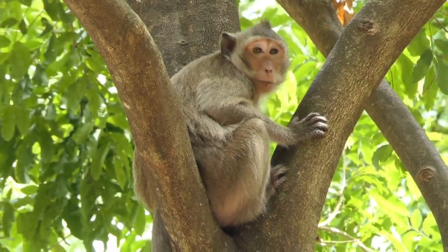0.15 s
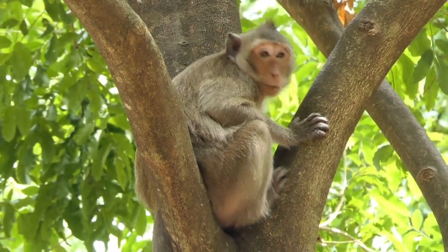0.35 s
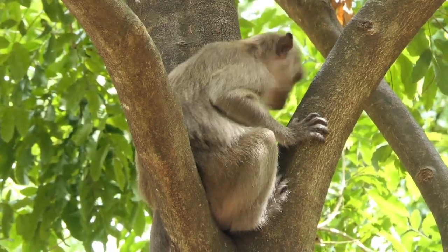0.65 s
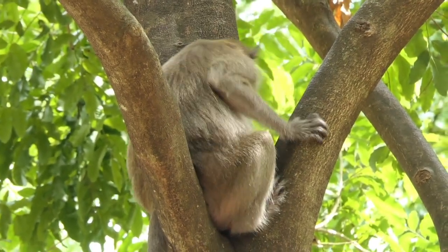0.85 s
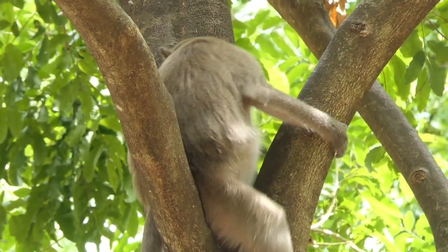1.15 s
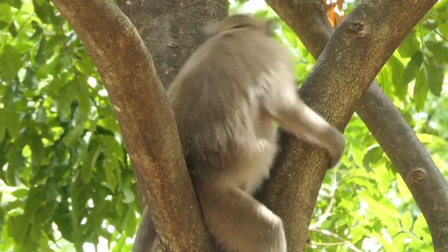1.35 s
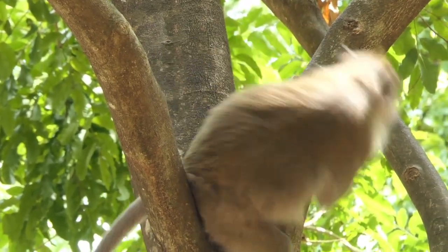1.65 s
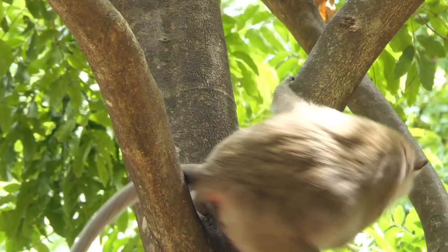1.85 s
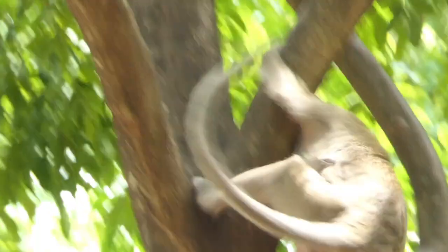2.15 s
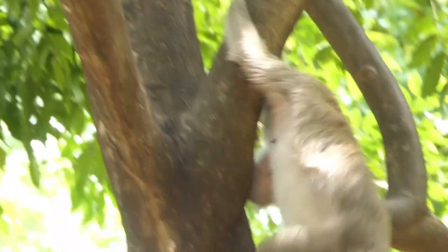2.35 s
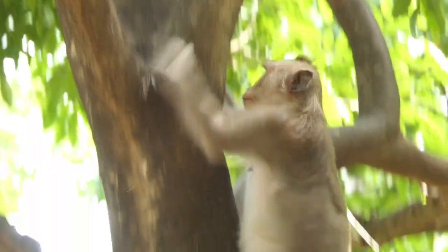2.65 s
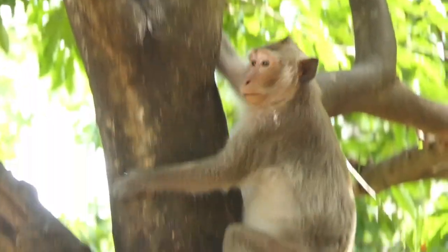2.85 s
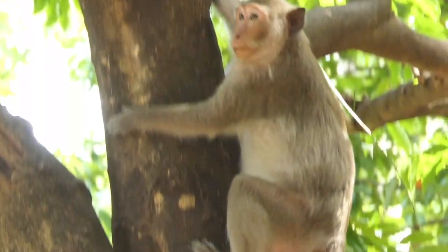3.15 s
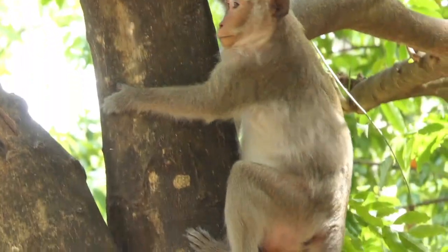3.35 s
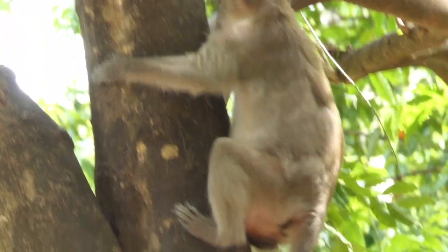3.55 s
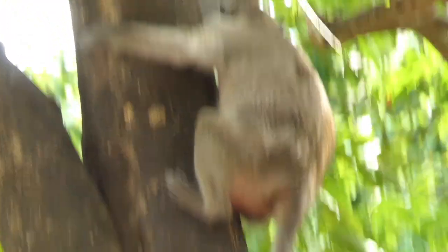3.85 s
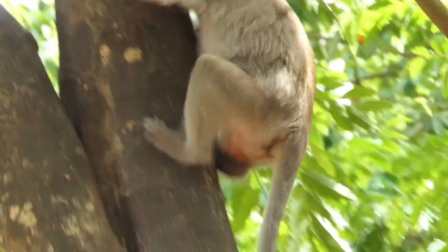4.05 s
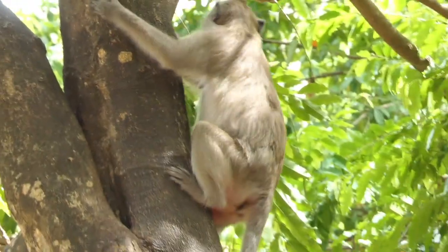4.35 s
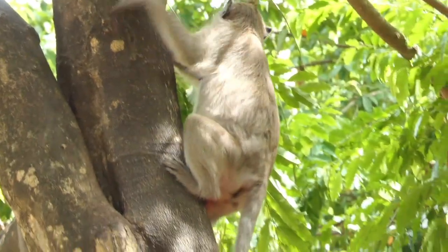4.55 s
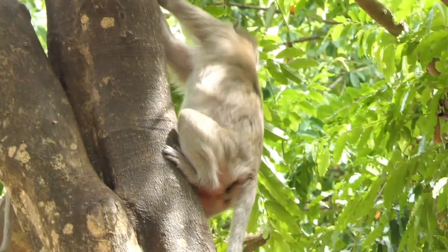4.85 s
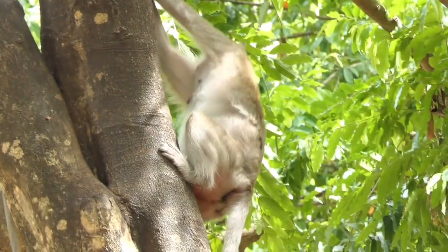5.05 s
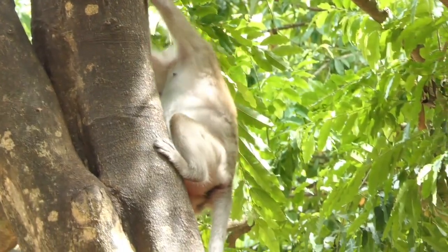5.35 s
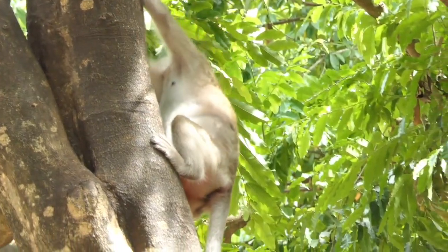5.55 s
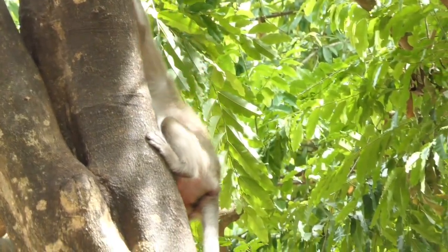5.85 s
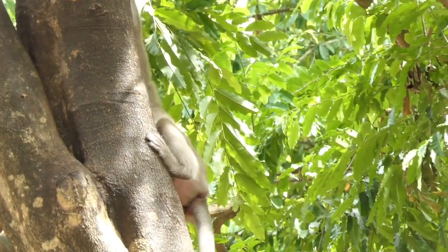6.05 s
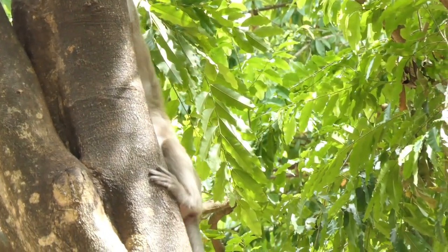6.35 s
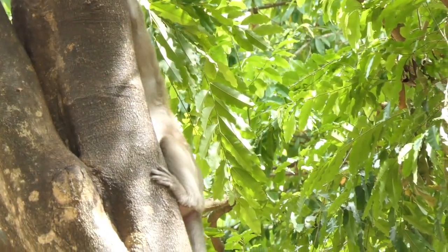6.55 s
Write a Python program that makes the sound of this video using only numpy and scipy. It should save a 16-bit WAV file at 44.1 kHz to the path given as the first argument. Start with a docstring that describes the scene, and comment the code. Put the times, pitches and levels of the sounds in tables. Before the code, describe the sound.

Outdoors, dry leaves and twigs are disturbed close to a stereo microphone, with almost no reverberation. From 0 to 0.4 s a tight cluster of sharp woody snaps comes with a sudden crunch at 0.25 s. Small treads and single clicks follow around 0.8 to 1.4 s, with a very short stem creak at 1.15 s and thin scrapes. From 1.8 to 2.3 s brittle snaps and a strong leafy drag swell up; another dense burst of crunching and cracking runs from 2.6 to 3.3 s, then lighter treads until about 4.1 s. A lull leaves faint leaf stirring and a soft, narrow insect hiss peaking near 5.4 s. From 6.1 s rustling and clicks build to a loud snap at about 6.65 s. Throughout, a distant engine idles in a low hum, speeding slightly then slowing, beneath a soft wash of air.

```python
"""Animals move in dry leaves: resonant clicks snap at once, treads crush noise crackle from 0.25 s on.
At 1.15 s a bent stem creaks in harmonics; then treads and drags, gated noise with hiss, until about 4 s.
In the lull a narrow insect hiss swells near 5.4 s; a last drag and a loud snap end the scene at 6.7 s.
Throughout, a far engine, a sum of sines, idles a little faster, then slower, over a noise wash of air."""
import sys
import numpy as np
from scipy import signal
from scipy.io import wavfile

SR = 44100
rng = np.random.default_rng(int(sys.argv[2]) if len(sys.argv) > 2 else 0)


def log_audio(samples):
    """Write samples as a 16-bit WAV file to the path given in sys.argv[1]."""
    # one column per channel
    frames = np.atleast_2d(samples).T
    # limit to full scale, then quantise
    limited = np.clip(frames, -1, 1)
    pcm = np.round(limited * 32767).astype(np.int16)
    wavfile.write(sys.argv[1], SR, pcm)


def boost(x):
    """Linear amplitude factor 10**(x/20) for a level x in decibels (scalar or array-like)."""
    u = np.asarray(x, float) / 20
    return 10 ** u


N = 295470


def rms_one(x):
    """Scale to unit power."""
    return x / np.sqrt(np.mean(x ** 2) + 1e-20)


def in_time(rows):
    """Each column of a table as a curve per sample; the first column is seconds."""
    s, *columns = np.transpose(rows)
    return [np.interp(np.arange(N) / SR, s, c) for c in columns]


def at_hz(points, hz):
    """Read a spectrum on a log-frequency axis."""
    point_hz, db = np.array(points).T
    return np.interp(np.log(hz), np.log(point_hz + 1), db)


def drift(rate_hz):
    """Slow random curve of spread 1: noise through a two-pole low-pass."""
    r = np.exp(-80 * np.pi * rate_hz / SR)  # one step per 40 samples
    noise = rng.standard_normal(N // 40 + 2002)
    slow = signal.lfilter([1], [1, -2 * r, r * r], noise)[2000:]
    return np.interp(np.arange(N) / 40, np.arange(len(slow)), rms_one(slow))


def resonate(x, hz, width_hz):
    """One resonance, gain 1 on top."""
    r = np.exp(-np.pi * width_hz / SR)
    b = [(1 - r * r) / 2, 0, (r * r - 1) / 2]
    a = [1, -2 * r * np.cos(2 * np.pi * hz / SR), r * r]
    return signal.lfilter(b, a, x)


def resonate_twice(x, hz, width_hz):
    """Two equal resonances in series: steeper skirts."""
    return resonate(resonate(x, hz, width_hz), hz, width_hz)


# Stereo width. Each row: frequency in Hz, side re mid in dB before widening and random variation.
SIDE_RE_MID = [(25, -7), (100, -26), (200, -34), (700, -22.5), (1500, -18.5), (2800, -23.5), (5600, -20),
               (8000, -21), (10000, -9), (14000, -0.5)]


def third_octaves(pair, low_hz, wider_db, side_varies_db):
    """Yields centre Hz and stereo band; the side part, opposite in left and right, varies randomly in level."""
    edges_hz = low_hz * 2 ** np.arange(0, np.log2(17000 / low_hz), 1 / 3)
    for k, (low, high) in enumerate(zip(edges_hz, edges_hz[1:])):
        sos = signal.butter(2, [low, high], "band", fs=SR, output="sos")
        mid, side = signal.sosfilt(sos, pair[k % len(pair)])  # neighbour bands use separate noise
        hz = np.sqrt(low * high)
        side_db = at_hz(SIDE_RE_MID, hz) + wider_db * min(1, 500 / hz) + side_varies_db * drift(6.9)
        yield hz, mid + boost(side_db) * side * [[1], [-1]]


AIR_RMS_DB = -40
# Air spectrum. Each row: frequency in Hz, relative density in dB per Hz.
AIR_SPECTRUM = [(25, -32), (69, -20), (118, -2.5), (167, 0.5), (309, -6), (515, -33), (856, -17.5),
                (1670, -16), (2780, -16.5), (3440, -20.5), (9520, -30.5), (15000, -57)]


def open_air(patchy_db):
    """A smooth wash of far foliage and rumble: noise whose bands each breathe a little."""
    noise = rng.standard_normal((2, 2, N))
    wash = 0
    for hz, band in third_octaves(noise, 26.6, wider_db=3.5, side_varies_db=4.0):
        breath_db = patchy_db * min(1, 400 / hz) * drift(1.47)
        wash = wash + band * boost(at_hz(AIR_SPECTRUM, hz) + breath_db)
    return boost(AIR_RMS_DB) * rms_one(wash)


# Idling engine. Each row: time in seconds, firings per second, level in dB before a 2 dB cut,
# tilt in dB per multiple about the sixth.
ENGINE_IDLE = [(0, 30.1, -40, 0.1), (.5, 31.5, -40, 0.1), (3.2, 31.5, -38, 0.1), (4.2, 31.05, -40, -.3),
               (4.6, 30.35, -41, -.5), (5.5, 30.1, -40, -.8), (6.7, 29.6, -41, -.8)]
# Engine harmonics. Each row: multiple of the firing rate, relative level in dB.
ENGINE_MULTIPLES = [(2, -22.5), (3, -16), (4, -10), (5, 0), (6, 3), (7, -1), (8, -5), (9, -3), (10, -18),
                    (11, -14)]


def engine(waver_db, wander_rad):
    """Multiples of the firing rate, each swelling and slipping in phase on its long way through the air."""
    firings_per_s, db, tilt_db = in_time(ENGINE_IDLE)
    turn = 2 * np.pi * np.cumsum(firings_per_s) / SR
    hum = 0
    for k, level_db in ENGINE_MULTIPLES:
        swell_db = level_db + tilt_db * (k - 6) + waver_db * drift(1.5)
        hum = hum + boost(swell_db) * np.sin(k * turn + wander_rad * drift(1.2))
    return boost(db - 2.0) * rms_one(hum)


# Far insect band. Each row: time in seconds, level in dB.
INSECT_LEVEL = [(4.2, -70), (4.8, -54), (5.4, -47.5), (6.1, -66)]


def insects():
    """A faint narrow band of noise that swells in the lull."""
    hiss = resonate_twice(rng.standard_normal(N), 2780, width_hz=330)
    return boost(in_time(INSECT_LEVEL)[0]) * rms_one(hiss)


# Rubbed stems and stiff leaves. Each row: start in seconds, length in seconds, level in dB, mode in Hz.
RUBS = [(0.318, 0.012, -36, 3700), (0.33, 0.027, -33.5, 616), (1.112, 0.022, -42.5, 6040),
        (1.11, 0.016, -44, 9000), (1.169, .025, -41.5, 6150), (1.17, 0.024, -43, 9500),
        (1.215, 0.16, -37.5, 4130), (1.361, 0.037, -39.5, 5600), (2.874, 0.057, -39, 1010),
        (2.889, 0.037, -34.5, 3980), (2.978, 0.021, -33.5, 4120), (3.79, 0.018, -34, 5370),
        (3.79, 0.017, -31, 6900), (6.44, 0.084, -40, 6740), (6.336, 0.049, -43, 2030),
        (6.449, 0.11, -39.5, 2130)]


def scrapes(slips_per_s, cycles, fade_s):
    """Dense uneven slips ring one narrow mode for the length of the stroke."""
    out, t = np.zeros(N + SR), np.arange(SR // 4) / SR
    draws = rng.random((len(RUBS), 2, len(t)))
    for (s, length_s, db, hz), (when, size) in zip(RUBS, draws):
        slips = (when < slips_per_s / SR) * (2 * size - 1) + 1e-9
        stroke = np.clip(np.minimum(t / 0.0025, 1 + (length_s - t) / fade_s), 0, 1)
        ring = rms_one(resonate_twice(slips, hz, np.sqrt(hz * 2000) / cycles))
        start = round(s * SR)
        out[start:start + len(t)] += boost(db) * stroke * ring
    return out[:N]


CREAK_S, CREAK_LENGTH_S, CREAK_HZ, CREAK_DB = 1.153, 0.033, 758, -30.5


def creak(tilt_db):
    """A bent stem creaks once: regular stick-slip gives a short stack of harmonics."""
    t = np.arange(N) / SR - CREAK_S
    stack = sum(boost(tilt_db * k) * np.sin(2 * np.pi * (k + 1) * CREAK_HZ * t) for k in range(4))
    swell = np.sin(np.pi * np.clip(t / CREAK_LENGTH_S, 0, 1)) ** .5
    return boost(CREAK_DB) * stack * swell


# Single snaps. Each row: start in seconds, peak in dB, low ring in Hz, high ring in Hz,
# weight of the low ring in dB (limited to 0.95 of the mix).
SNAP_EVENTS = [(0.0343, -24.5, 2000, 9050, -24), (0.063, -16.5, 1270, 4400, -2),
               (0.19, -22, 1940, 8400, -14), (0.2005, -29, 1970, 9900, -22), (0.2505, -22, 2030, 9400, -9),
               (0.269, -14.5, 696, 4500, -8.5), (0.2833, -11, 958, 4330, -9),
               (0.2902, -16, 2300, 10700, -14), (0.3217, -21, 910, 3700, -13),
               (0.3406, -31, 2300, 6960, -17), (0.3495, -23, 2000, 10400, -20),
               (0.357, -11.5, 890, 8500, -7), (0.81, -15, 2360, 8550, -22),
               (0.9802, -24.5, 2240, 6650, -5.5), (1.0751, -19, 2500, 4100, -4),
               (1.148, -28, 6000, 9300, -6), (1.2026, -19.5, 2600, 4300, -9), (1.359, -22, 4200, 7500, -6),
               (1.773, -12.5, 2700, 6640, -34), (1.8406, -22.5, 2950, 9900, -31),
               (1.856, -21, 2707, 9100, -22), (1.9282, -21, 1450, 9600, -23), (1.9445, -19, 1980, 4000, -9),
               (2.014, -13, 3070, 6000, -12), (2.151, -15.5, 3020, 4200, -13),
               (2.7807, -18, 1980, 3300, -7.5), (2.911, -16, 1040, 4150, -4), (2.958, -16, 1000, 5000, -17),
               (2.984, -24, 1000, 5000, -3), (3.0245, -13, 1010, 6440, -8), (3.0374, -15, 2150, 6300, -19),
               (3.0695, -18, 970, 6300, -5), (3.134, -18, 990, 9500, -4), (3.166, -20, 1050, 3000, 4),
               (3.179, -21, 2540, 7500, -7), (3.195, -23, 2500, 8100, -16), (3.3102, -25.5, 2180, 9050, -7),
               (3.559, -19.5, 800, 2170, -2), (3.7915, -18, 2100, 5440, -10),
               (3.8048, -14, 2370, 5400, -17), (3.8102, -19, 2300, 5500, -24),
               (3.8352, -19, 4940, 8660, -5), (3.932, -31, 3500, 9500, -16), (4.04, -30, 2200, 5000, 4),
               (4.071, -22.5, 940, 9000, -6), (6.132, -22.5, 1820, 5060, -7), (6.301, -21, 2020, 9300, -30),
               (6.338, -27, 2400, 5600, -12), (6.37, -22, 2140, 5200, -5), (6.482, -26, 1100, 3000, 3),
               (6.506, -21, 2100, 5360, -9), (6.521, -24, 5500, 9500, -6), (6.635, -21.5, 939, 4900, 0),
               (6.65, -27, 1010, 10600, -2), (6.6631, -6.5, 2690, 4050, -5.5)]


def snaps(dies_s, low_cycles, high_cycles, tick_db, side_db):
    """A short dying burst rings a low and a high mode of the piece, with a broad tick at the same onset."""
    out, t = np.zeros((2, N + SR)), np.arange(SR // 20) / SR
    envelope = boost(-60 * t / dies_s) * np.minimum(t / 0.0002, 1)
    bursts = rng.standard_normal((len(SNAP_EVENTS), 2, len(t))) * envelope
    for (s, db, low_hz, high_hz, low_db), (burst, other) in zip(SNAP_EVENTS, bursts):
        # stiff pieces ring higher and longer, soft ones give a dull knock
        low = resonate(burst, low_hz, low_hz / (low_cycles * min(low_hz / 2000, 1.3) ** 2))
        high = burst + boost(side_db) * high_hz / 10000 * other * [[1], [-1]]
        high = resonate_twice(high, high_hz, high_hz / high_cycles)
        # the tick reaches somewhat above the high mode
        tick = signal.lfilter(*signal.butter(3, min(1.5 * high_hz, 14000), fs=SR), burst)
        bright = high / np.abs(high).max() + boost(tick_db) * tick
        share = np.clip(boost(low_db), 0, .95)
        sound = share * low / np.abs(low).max() + (1 - share) * bright
        start = round(s * SR)
        out[:, start:start + len(t)] += boost(db) * sound / np.abs(sound).max()
    return out[:, :N]


ATTACK_DB_PER_S, RELEASE_DB_PER_S = 1200, 350
BUILD_DB = 14.5  # gained by a drag over its build-up
SETTLE_DB, SETTLE_DB_PER_S = -5, 98  # pressed leaves spring back after every move
# Faint stirring of litter. Each row: time in seconds, thin leaves in dB, then heavy litter,
# broad leaves and brittle edges in dB re thin. Levels drive the later stages.
STIRRING = [(0, -41.5, -13, -2, -4), (.2, -59.5, -14, 3, 13.5), (.45, -70.5, 21, -63, -4),
            (.95, -53.5, 7.5, -7, 9.5), (1.5, -43.5, -6.5, 2, -9), (1.85, -46, -11, 1, -2.5),
            (2.45, -51.5, 3, 3, -24.5), (3.2, -42, -0.5, 2.5, 0.5), (3.75, -47.5, 2.5, 4, -1.5),
            (4.3, -48.5, -1, 5, 3.5), (5.0, -48, 3.5, 7, -5.5), (5.9, -47, 2, 7, -2.5),
            (6.3, -41, -4, -1.5, -5), (6.7, -37, -30, 5.5, 4.5)]
# Treads, sudden then fading. Each row: start in seconds, hold in seconds, then the same four levels.
TREAD_MOVES = [(0.254, 0.1, -34.5, -0.5, -7, 2), (0.456, 0.23, -43, -32, -13, -1.5),
               (0.784, 0.077, -43.5, -27, -3, 1), (1.066, 0.027, -39.5, -5, -4, -13),
               (1.167, 0.072, -35, -6, 2, 2.5), (1.25, 0.12, -35.5, -3, -9, 5.5),
               (1.944, 0.0067, -35.5, -9, -9, -3), (2.14, 0.18, -39.5, -9, -4, 2.5),
               (2.783, 0.013, -30, -6.5, -0.5, 3), (2.843, 0.1, -31.5, -3.5, -6, 5),
               (3.44, 0.12, -40.5, -20, -4, -3.5), (3.789, 0.0086, -36.5, -2.5, -18, 2),
               (4.019, 0.028, -44, 6.5, 6, 7)]
# Drags, building up. Each row: loudest moment in seconds, build-up in seconds, then the same four levels.
DRAG_MOVES = [(2.048, 0.061, -26.5, -10, 2.5, 2.5), (2.334, 0.047, -34, -9, 1, 4),
              (2.649, 0.28, -38, -22, 3.5, 0.5), (3.042, 0.14, -27, -3.5, -3.5, 6),
              (3.934, 0.095, -34, -0.5, 3.5, 7.5), (6.525, 0.27, -39.5, 0, 7, 9),
              (6.7, 0.18, -34, -2.5, -10, -17)]


def crushing():
    """Power of the four litter sizes from stirring and moves; each move rises, holds, lets go and settles."""
    t, moves = np.arange(0, N, 32) / SR, 1e-12
    shapes = [(s, s + hold_s, ATTACK_DB_PER_S, levels) for s, hold_s, *levels in TREAD_MOVES]
    shapes += [(s, s, BUILD_DB / build_s, levels) for s, build_s, *levels in DRAG_MOVES]
    for top_s, end_s, rise_db_per_s, (db, *others) in shapes:
        after_s = np.maximum(t - end_s, 0)
        fall_db = np.maximum(-RELEASE_DB_PER_S * after_s, SETTLE_DB - SETTLE_DB_PER_S * after_s)
        shape_db = fall_db - rise_db_per_s * np.maximum(top_s - t, 0)
        moves = moves + boost(db + shape_db + np.array([0] + others)[:, None]) ** 2
    moves = np.array([np.interp(np.arange(N) / SR, t, size) for size in moves])
    db, *others = in_time(STIRRING)
    stir = boost(db + np.array([0 * db] + others)) ** 2
    return stir, moves


def ticks(per_s, spread_db, cycles, db):
    """Small stiff bits break wherever the animal moves; each rings briefly at one of 16 pitches."""
    thin_power = crushing()[1][0]
    size = boost(spread_db * np.minimum(rng.exponential(1, N), 4))
    clicks = (rng.random(N) < per_s / SR) * size * rng.choice([-1, 1], N)
    dealt = rng.integers(0, 16, N)
    rings = 0
    for k, hz in enumerate(np.geomspace(2000, 7500, 16)):
        rings = rings + resonate_twice(clicks * (dealt == k) + 1e-18, hz, hz / cycles)
    return boost(db) * np.sqrt(thin_power) * rms_one(rings)


STIR_HISS_DB, MOVE_HISS_DB = 4.5, 10.5  # sliding hiss re crackle
# Where thin, heavy, broad and brittle litter sound, in that order, in Hz.
LITTER_HZ = [4900, 750, 2300, 11000]
# Leaf spectrum. Each row: frequency in Hz, relative density in dB per Hz.
LEAF_SPECTRUM = [(140, -29), (240, 12), (463, -6), (1010, -11.5), (1670, -1), (2160, -7), (3390, -10.5),
                 (4030, -4), (10400, -7), (12500, -22), (15000, -26.5)]


def leaves(cracks_per_s, spread_db, clump_db, patchy_db):
    """Countless uneven cracks, in clumps, over the hiss of sliding leaves; litter sizes shift the spectrum."""
    stir, moves = crushing()
    thin_db, *others = 10 * np.log10(stir + moves)
    order = np.argsort(LITTER_HZ)
    # only changes in the balance of sizes count, not its mean
    shift_db = (np.array([thin_db] + others) - thin_db)[order]
    shift_db -= shift_db.mean(axis=1, keepdims=True)
    clump = boost(clump_db * drift(40.0))
    born = rng.random(N) < cracks_per_s * boost(3.0 * drift(25)) / SR
    cracks = born * boost(spread_db * np.minimum(rng.exponential(1, N), 4))
    # a crack lasts a fraction of a millisecond, so it gates a short spit of noise
    spit = rms_one(signal.lfilter([1], [1, -.93], cracks))
    move_share = moves[0] / (stir[0] + moves[0])
    hiss = boost(STIR_HISS_DB + (MOVE_HISS_DB - STIR_HISS_DB) * move_share)
    drive = clump * (spit + hiss) / np.sqrt(1 + hiss ** 2) * rng.standard_normal((2, 2, N))
    out = 0
    for hz, band in third_octaves(drive, 252.7, wider_db=10.0, side_varies_db=4.0):
        place = np.interp(np.log(hz), np.log(np.sort(LITTER_HZ)), np.arange(len(order)))
        below = min(int(place), len(order) - 2)
        size_db = shift_db[below] + (place - below) * (shift_db[below + 1] - shift_db[below])
        # narrow low bands vary more from moment to moment than the wide treble
        patch_db = patchy_db * min(1, 2000 / hz) * drift(4.5)
        out = out + band * boost(at_hz(LEAF_SPECTRUM, hz) + size_db + patch_db)
    return boost(thin_db + 3.0) * rms_one(out)


# Hollows of the litter. Each row: time in seconds, low pitch in Hz, upper pitch in Hz.
HOLLOW_PITCHES = [(.24, 574, 2190), (.4, 950, 2170), (1.45, 700, 2780), (2.66, 885, 3270),
                  (2.78, 860, 1870), (3.05, 920, 2060), (4, 904, 2100), (5.3, 790, 1830), (6.5, 900, 2040)]


def hollows(x, low_db, upper_db, sharpness):
    """Air pockets in the pressed litter ring at pitches that shift with the animal."""
    for pitch_hz, db in zip(in_time(HOLLOW_PITCHES), (low_db, upper_db)):
        rung, state = np.zeros_like(x), np.zeros((2, 2))
        for i in range(0, N, 256):
            r = np.exp(-np.pi * pitch_hz[i] / sharpness / SR)
            w = 2 * np.pi * pitch_hz[i] / SR
            b, a = [(1 - r * r) / 2, 0, (r * r - 1) / 2], [1, -2 * r * np.cos(w), r * r]
            rung[:, i:i + 256], state = signal.lfilter(b, a, x[:, i:i + 256], zi=state)
        x = x + boost(db) * rung
    return x


# Echo off a surface behind the litter. Each row: time in seconds, delay in ms, strength from 0 to 1.
ECHO = [(0, 0.73, 0.05), (.7, 0.56, 0.28), (1.15, 0.67, 0), (2, 0.81, 0.44), (2.7, 0.776, 0.23),
        (3.05, 0.55, 0.4), (3.4, 0.65, 0)]


def with_echo(x):
    """The inverted, slightly duller echo combs the spectrum; the teeth move as the animal does."""
    delay_ms, strength = in_time(ECHO)
    earlier = np.arange(N) - delay_ms * SR / 1000
    dull = signal.lfilter([.7], [1, -.3], x)
    echo = np.array([np.interp(earlier, np.arange(N), c) for c in dull])
    return x - np.clip(strength, 0, .9) * echo


def scene():
    """Litter and snaps close by, engine, insects and air far off."""
    litter = leaves(cracks_per_s=800, spread_db=-0.5, clump_db=1.44, patchy_db=1.5)
    litter = litter + ticks(per_s=1800, spread_db=2.5, cycles=8.0, db=-4.0)
    litter = hollows(litter, low_db=10.5, upper_db=-2.5, sharpness=5.44)
    cracks = snaps(dies_s=.01, low_cycles=9.0, high_cycles=4.5, tick_db=-7.0, side_db=-22.0)
    rubbed = scrapes(slips_per_s=1500, cycles=7.0, fade_s=0.012) + creak(tilt_db=-3.5)
    idling = engine(waver_db=1.5, wander_rad=.35)
    return with_echo(litter) + cracks + idling + insects() + open_air(patchy_db=4.0) + rubbed


def bell(x, hz, width_hz, db):
    """A peak or dip in the response."""
    w, a = 2 * np.pi * hz / SR, boost(db / 2)
    k = np.sin(w) * width_hz / hz / 2
    middle = -2 * np.cos(w)
    return signal.lfilter([1 + k * a, middle, 1 - k * a], [1 + k / a, middle, 1 - k / a], x)


# Microphone housing. Each row: frequency in Hz, width in Hz, gain in dB.
HOUSING_BELLS = [(1708, 340, -6.5), (3890, 280, 3.5), (7800, 830, -4)]


def housing(x):
    """Resonances of the housing colour both channels; the left port hears more treble."""
    x = x.copy()
    for hz, width_hz, db in HOUSING_BELLS:
        x = bell(x, hz, width_hz, db)
    x[0] = bell(x[0], 12000, width_hz=7000, db=5.0)
    return x


def band_limit(x):
    """A steep low-pass at the top of the band."""
    return signal.sosfilt(signal.butter(12, 16510, fs=SR, output="sos"), x)


def record(dry):
    """The housing colours the sound, then a steep low-pass cuts the top."""
    top_hz, ripple_db = 15500, 1
    low_pass = signal.cheby1(10, ripple_db, top_hz, fs=SR, output="sos")
    mix = signal.sosfilt(low_pass, housing(dry))
    return band_limit(mix)


dry = scene()
out = record(dry)
log_audio(out)
```